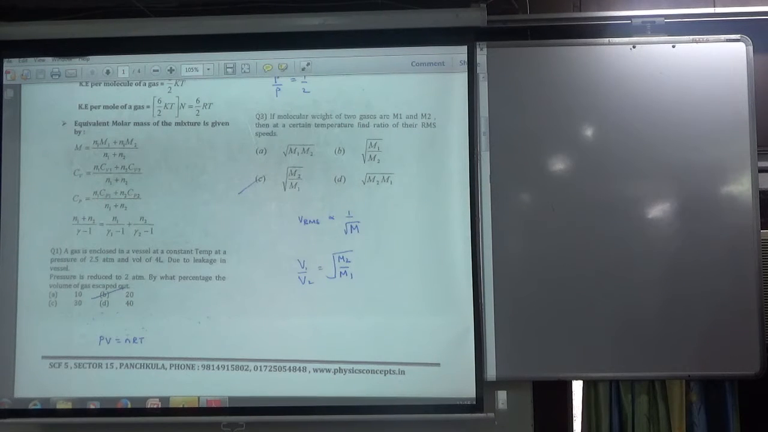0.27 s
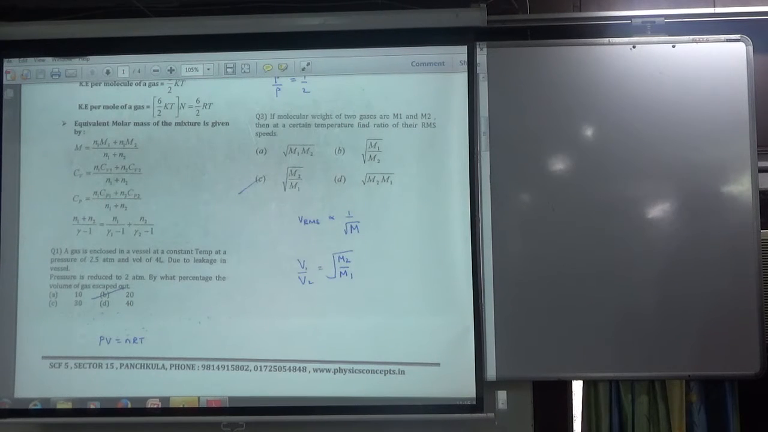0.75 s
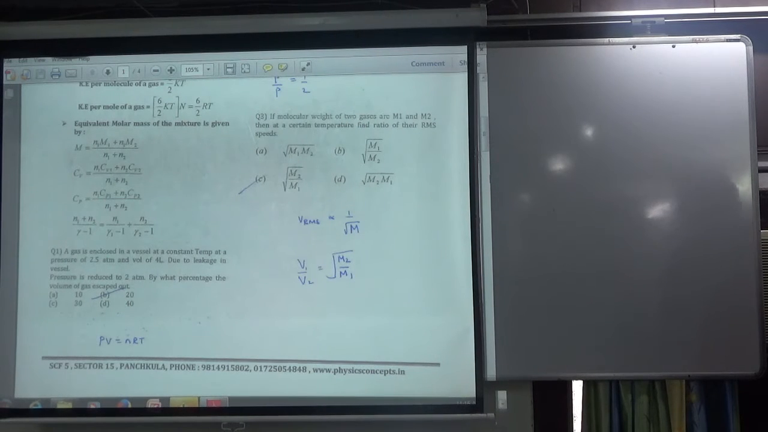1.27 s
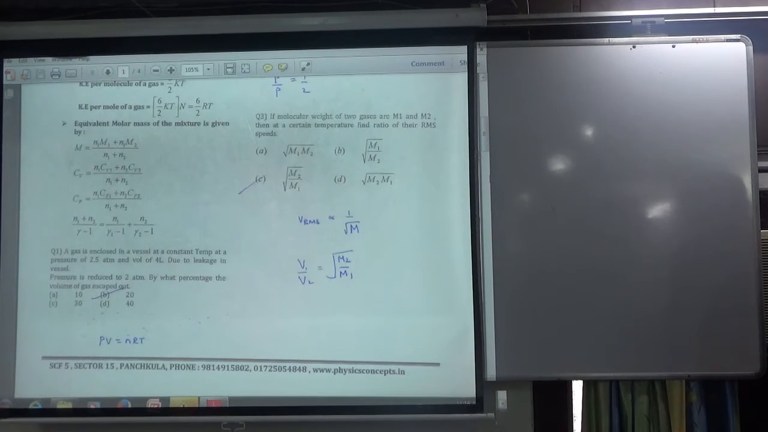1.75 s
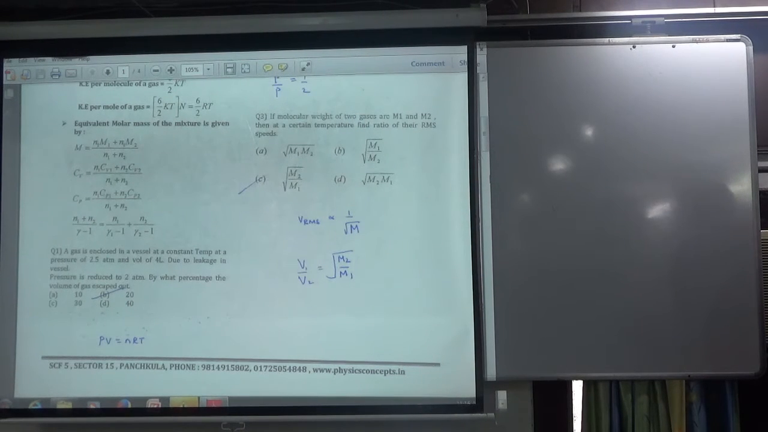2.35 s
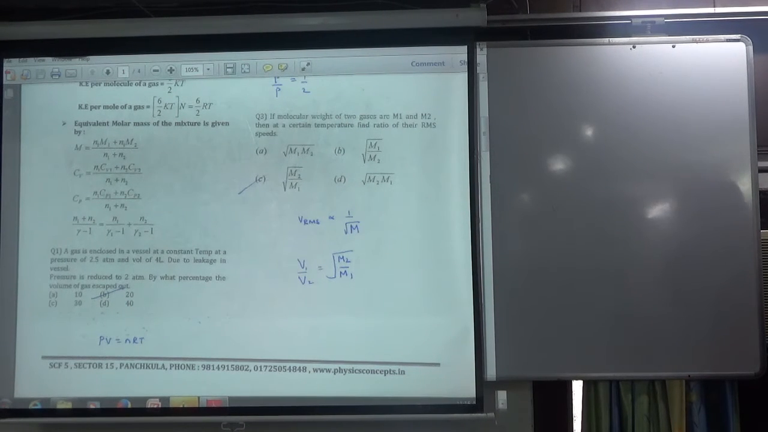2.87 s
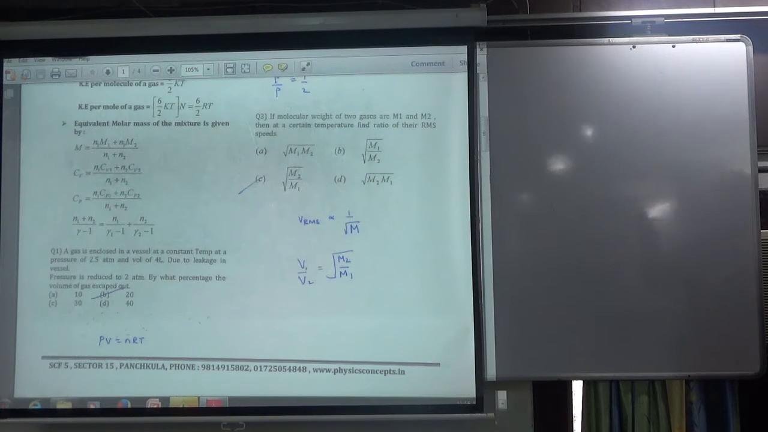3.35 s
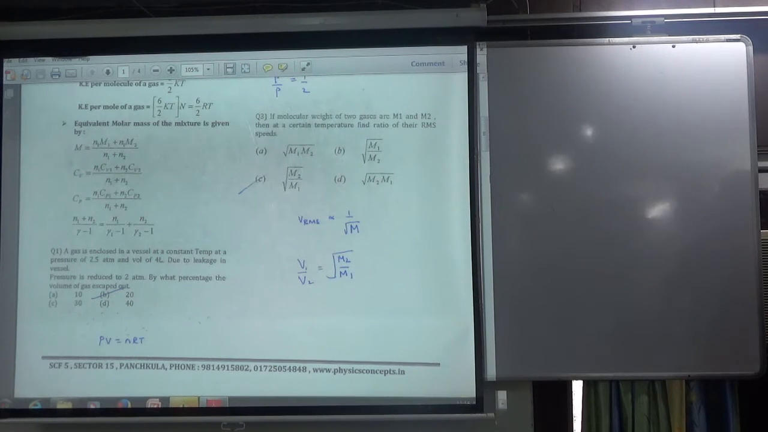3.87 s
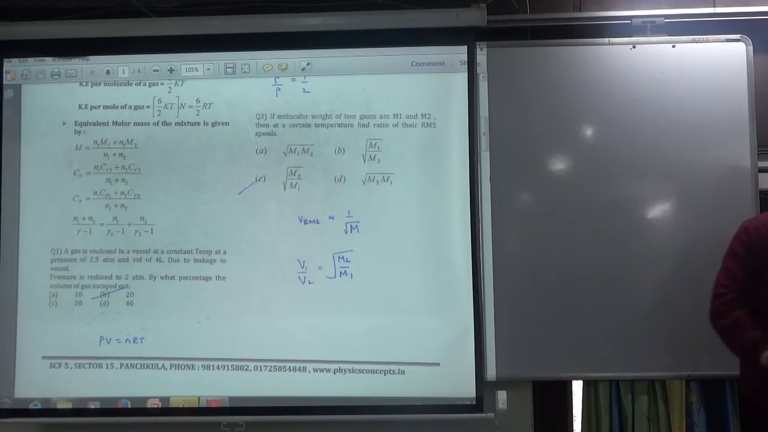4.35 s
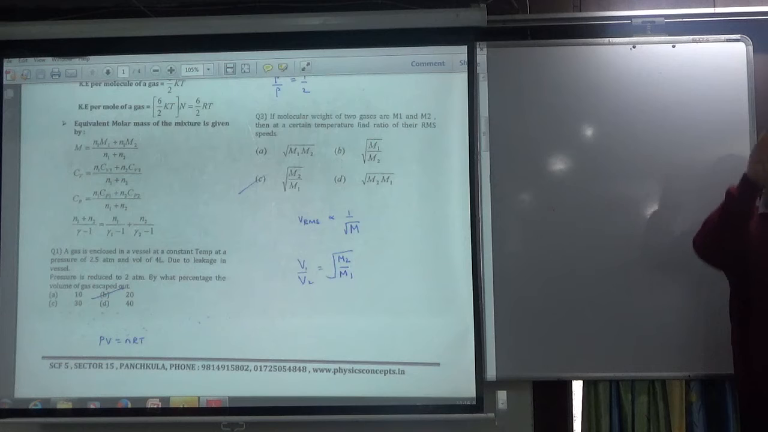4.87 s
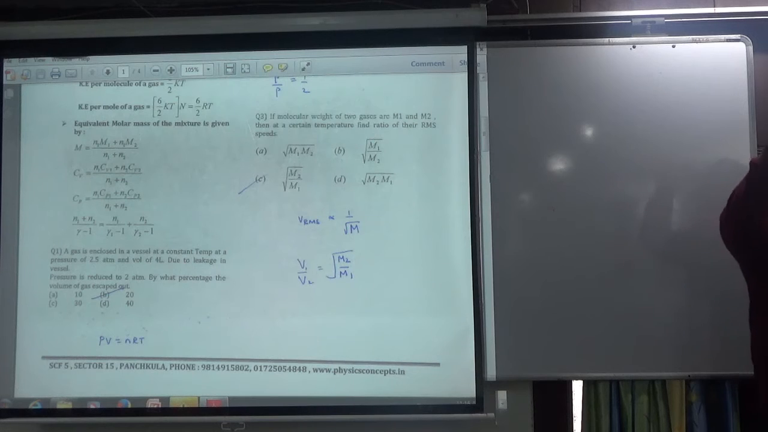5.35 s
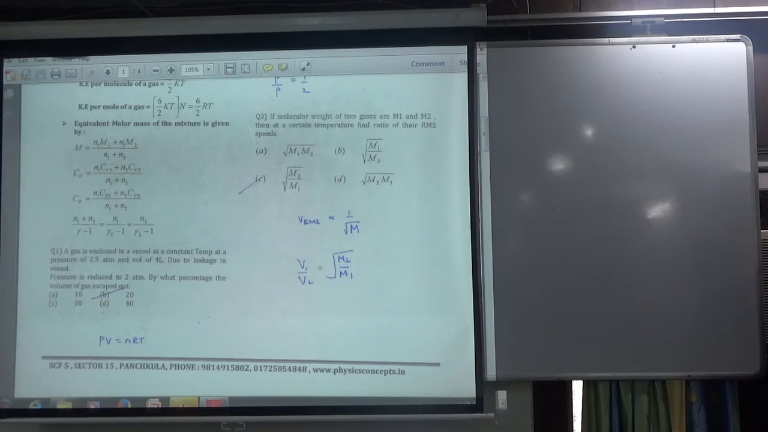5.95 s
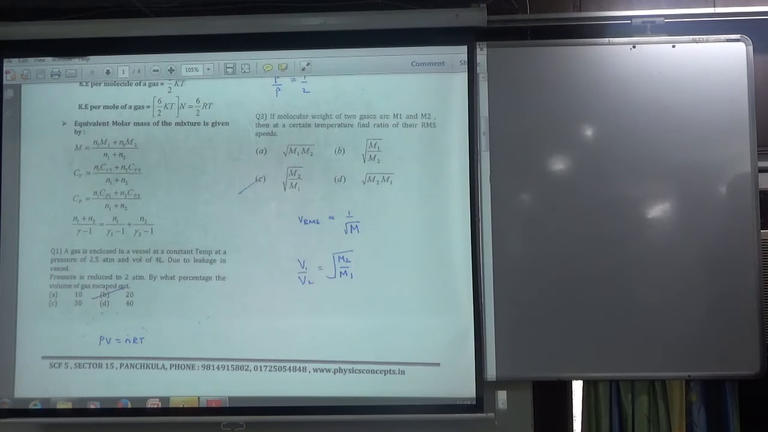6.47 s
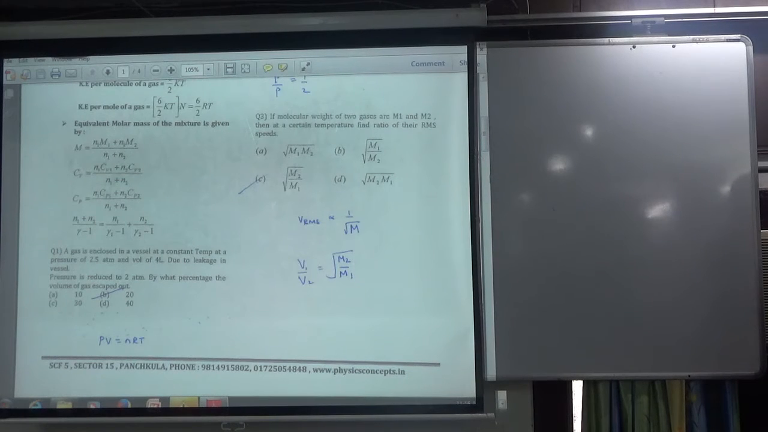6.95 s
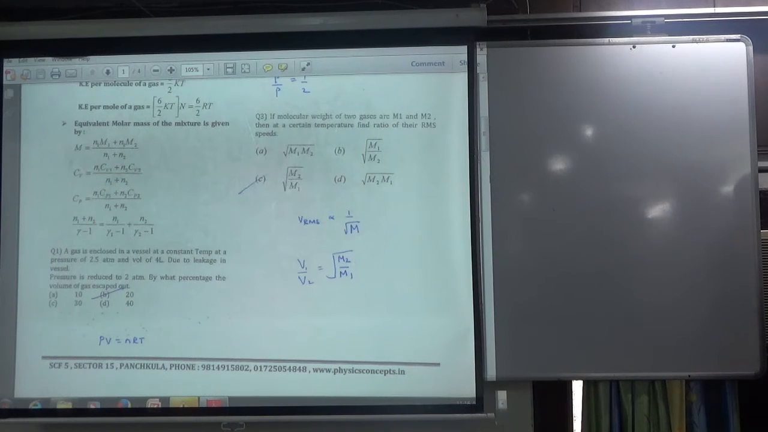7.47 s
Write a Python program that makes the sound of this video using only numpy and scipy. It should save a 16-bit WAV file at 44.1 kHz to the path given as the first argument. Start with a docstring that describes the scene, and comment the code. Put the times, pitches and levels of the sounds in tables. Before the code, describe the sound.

Steady electrical hum at a low pitch grows from quiet to strong, its thin buzz and faint amplifier hiss rising along with it.

```python
"""In a classroom, mains hum leaks into a microphone line and swells in uneven steps.
The hum is a supply's rectifier drawing two unequal charging pulses in each mains cycle, rounded by lags.
A faint buzz of high mains overtones, built from sines, and the preamplifier's hiss, built from
coloured noise, rise with it."""
import sys
import numpy as np
from scipy import signal
from scipy.fft import rfft, irfft, next_fast_len
from scipy.io import wavfile
from scipy.ndimage import uniform_filter1d, map_coordinates

SR = 44100
rng = np.random.default_rng(int(sys.argv[2]) if len(sys.argv) > 2 else 0)


def generate_wav(sig):
    """Save sig (samples, or channels by samples) to the path in sys.argv[1] as 16-bit PCM at SR."""
    pcm = np.round(np.clip(np.atleast_2d(sig).T, -1, 1) * 32767).astype(np.int16)
    wavfile.write(sys.argv[1], SR, pcm)


N = 340011

MAINS_HZ = 49.9298
START_CYCLE = .757  # part of the mains cycle already gone at the start
HISS_START_DB, HISS_WAIT_S, HISS_DB_PER_S = -54, 0.51, 1.6154  # it waits, then climbs steadily
HUM_WAVER_DB, HUM_WAVER_KNOTS_PER_S = 0.18, 6
BUZZ_START_DB, BUZZ_DB_PER_HISS_DB = -69, 0.83  # the higher buzz: reference level, climb against the hiss
LOW_BUZZ_BELOW_HUM_DB = 40.5
BUZZ_WAVER_DB, BUZZ_WAVER_KNOTS_PER_S = .8, 3.03
FAINT_FROM, FAINT_TO = 45, 120  # range of the faint odd multiples of the mains
FAINT_DB, FAINT_DB_PER_OCTAVE, FAINT_SCATTER_DB = -15, -3.5, 2  # against the higher buzz
HUM_LOW_HZ, HUM_HIGH_HZ = 27, 660
TOP_HZ = 11050


def amp(db):
    """Gain of a level in dB."""
    return 10 ** (np.asarray(db) / 20)


def unit(x):
    """x at rms 1."""
    return x / np.sqrt(np.mean(x ** 2))


def curves(rows):
    """One value per sample for each column after the time."""
    s, *cols = np.transpose(rows)
    return [np.interp(np.arange(N) / SR, s, c) for c in cols]


def wobble(rate):
    """A smooth random curve, rate knots a second."""
    knots = rng.standard_normal(int(N * rate / SR) + 4)
    return map_coordinates(knots, [np.arange(N) * rate / SR])


def filtered(x, response):
    """x with its spectrum multiplied by a (possibly complex) response of frequency."""
    m = next_fast_len(N + SR // 2)  # spare room keeps the tail from wrapping round
    return irfft(rfft(x, m) * response(np.fft.rfftfreq(m, 1 / SR)), m)[..., :N]


def cycles():
    """Mains cycles gone by at each sample."""
    return START_CYCLE + MAINS_HZ * np.arange(N) / SR


def mains_sine(multiple):
    """An overtone locked to the mains, at a random phase."""
    return np.sin(2 * np.pi * (multiple * cycles() + rng.random()))


def hiss():
    """Amplifier noise, stronger in the bass, with faint time-frequency patches of random gain."""
    # Tone colour of the hiss. Each row: frequency in Hz, relative density in dB per Hz.
    hiss_colour = [(20, 2), (60, 0), (250, 11), (450, 10), (650, -0.5), (1000, -0.5), (1600, -0.5),
                   (2500, -1.5), (5000, -2), (11000, -2)]
    z = signal.stft(rng.standard_normal(N + SR // 10), nperseg=512)[2]
    field = uniform_filter1d(rng.standard_normal(z.shape), size=12, axis=0)  # smooth over frequency
    field = uniform_filter1d(field, size=10, axis=1)  # then over time
    patchy = signal.istft(z * amp(0.72 * unit(field)), nperseg=512)[1][:N]
    f, db = np.transpose(hiss_colour)

    def colour(hz):
        return amp(np.interp(np.log(hz + 1), np.log(f), db))

    return unit(filtered(patchy, colour))


def buzz(hum_db, hiss_db):
    """Whole multiples of the mains, mostly odd: the lowest swell with the hum, the others with the hiss."""
    # Overtones that buzz and waver. Each row: multiple of the mains, relative level in dB.
    overtones = [(13, -8.4), (14, -5.4), (15, -5.2), (17, -6.3), (19, -10.3), (20, -13.1), (21, -5.5),
                 (22, -11.7), (23, -0.3), (25, -1.7), (27, -2.9), (29, -8.1), (31, -9.1), (33, -5.9),
                 (35, -8.0), (37, -11.1)]
    low_db = hum_db - LOW_BUZZ_BELOW_HUM_DB
    high_db = BUZZ_START_DB + BUZZ_DB_PER_HISS_DB * (hiss_db - HISS_START_DB)

    strong = 0
    for multiple, db in overtones:
        own_waver = BUZZ_WAVER_DB * wobble(BUZZ_WAVER_KNOTS_PER_S)
        swell_db = low_db if multiple < 18 else high_db
        strong = strong + amp(swell_db) * amp(db + own_waver) * mains_sine(multiple)

    odd = np.arange(FAINT_FROM, FAINT_TO, 2)
    faint_db = FAINT_DB + FAINT_DB_PER_OCTAVE * np.log2(odd / FAINT_FROM)
    faint_db = faint_db + FAINT_SCATTER_DB * rng.standard_normal(len(odd))
    faint = sum(amp(db) * mains_sine(multiple) for multiple, db in zip(odd, faint_db))
    return strong + amp(high_db) * faint


def hum():
    """Each half cycle a half-sine of current charges the supply; two lags round it and stretch its tail."""
    # Pulse scatter over time. Each row: time in seconds, timing scatter in microseconds, height scatter in dB.
    unsteady = [(0, 10, 0), (7.71, 22, 0.22)]
    # The rectifier's two halves. Each row: start as part of the cycle, length in ms, size in dB,
    # slow lag in ms, fast lag in ms.
    charge = [(.855, 2.168, 0, 1.823, .581), (.358, 1.957, -.75, 1.713, 1.711)]
    # Smooth ripple at twice the mains. One row: level in dB against a pulse, crest as part of the cycle.
    ripple = (-28.5, .3186)
    scatter_us, scatter_db = curves(unsteady)
    ripple_db, crest = ripple
    total = amp(ripple_db) * np.cos(4 * np.pi * (cycles() - crest))

    for start, ms, db, slow, fast in charge:
        turn = cycles() + 1 - start
        # one draw of lateness and size for each pulse, held through its cycle
        late, size = rng.standard_normal((int(turn[-1]) + 1, 2))[turn.astype(int)].T
        delay_s = scatter_us / 10 ** 6 * (2 + np.clip(late, -2, 2))  # never early
        since = ((turn % 1) / MAINS_HZ - delay_s) / (ms / 1000)  # in pulse lengths
        # a pulse delivers the same charge, so a taller one is shorter
        taller = amp(scatter_db * size)
        pulse = amp(db) * taller * np.sin(np.pi * np.clip(since * taller, 0, 1))

        def lag(hz):
            slow_lag = 1 + 2j * np.pi * hz * slow / 1000
            fast_lag = 1 + 2j * np.pi * hz * fast / 1000
            return 1 / (slow_lag * fast_lag)

        total = total + filtered(pulse, lag)

    def band(hz):
        # the coupling capacitor passes no steady current; little is left above the twelfth overtone
        low = (hz / HUM_LOW_HZ) ** 4
        return low / (1 + low) / (1 + (hz / HUM_HIGH_HZ) ** 24)

    return unit(filtered(total - total.mean(), band))


def scene():
    """The hum swells in uneven steps, the hiss at an even pace, and the buzz follows both."""
    # Swell of the hum. Each row: time in seconds, level in dB.
    swell = [(0.08, -31), (0.28, -29.9), (0.52, -30.2), (0.94, -29), (1.1, -28.7), (1.28, -27.5),
             (1.9, -26.5), (2.4, -25.1), (3.12, -24.4), (3.36, -23), (3.96, -24), (4.14, -22),
             (4.52, -20.6), (5.12, -20.5), (5.38, -19.5), (5.94, -19.3), (6.16, -18.2), (6.44, -17.9),
             (6.74, -17), (7.62, -16.5)]
    hum_db, = curves(swell)
    hiss_db = HISS_START_DB + HISS_DB_PER_S * np.clip(np.arange(N) / SR - HISS_WAIT_S, 0, None)
    hum_part = amp(hum_db + HUM_WAVER_DB * wobble(HUM_WAVER_KNOTS_PER_S)) * hum()
    hiss_part = amp(hiss_db) * hiss()
    return (hum_part + hiss_part + buzz(hum_db, hiss_db))[None]


def record(dry):
    """A very steep low-pass leaves almost nothing above the band limit."""
    return filtered(dry, lambda hz: 1 / (1 + (hz / TOP_HZ) ** 400))


dry = scene()
out = record(dry)
generate_wav(out)
```